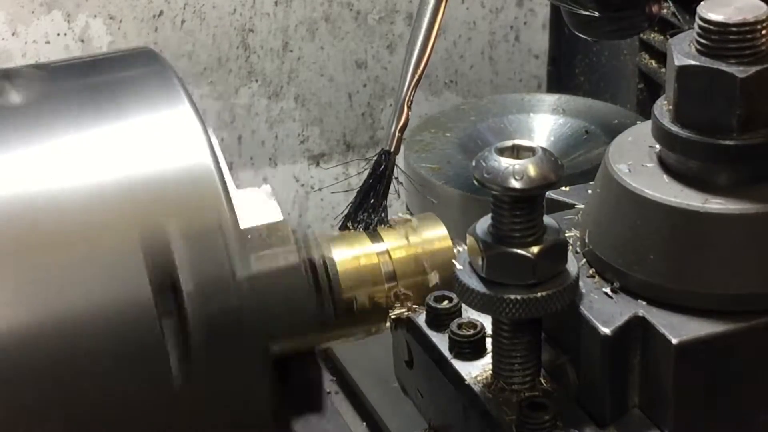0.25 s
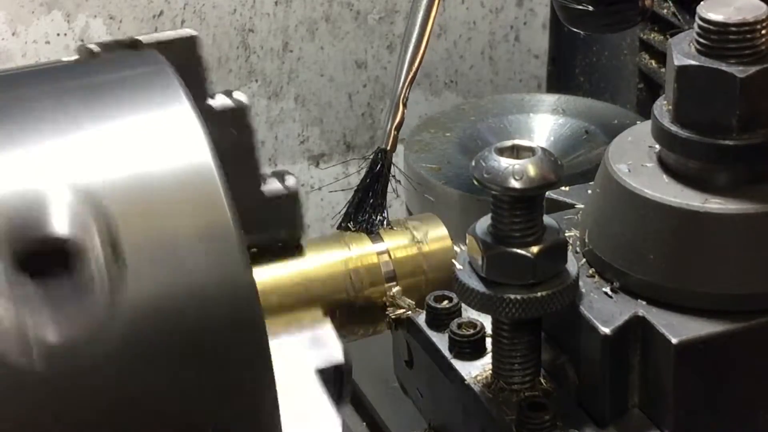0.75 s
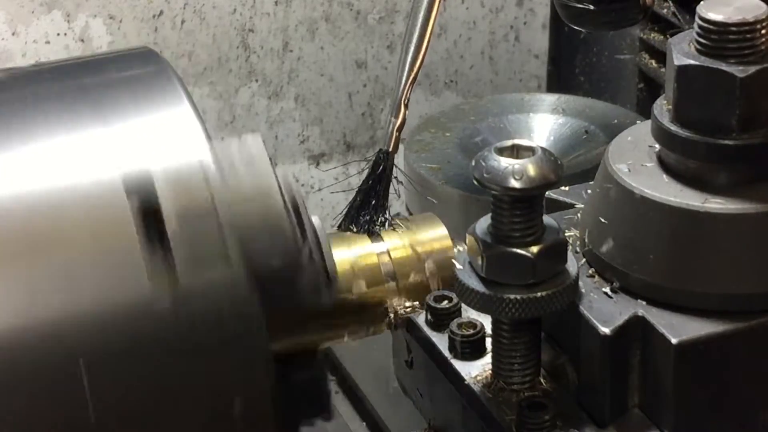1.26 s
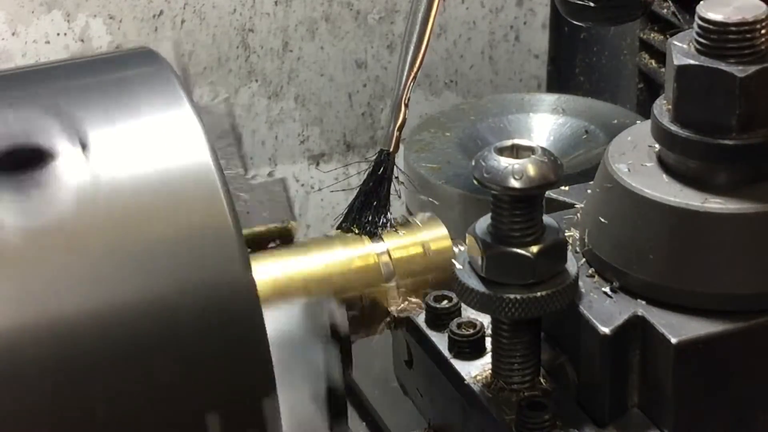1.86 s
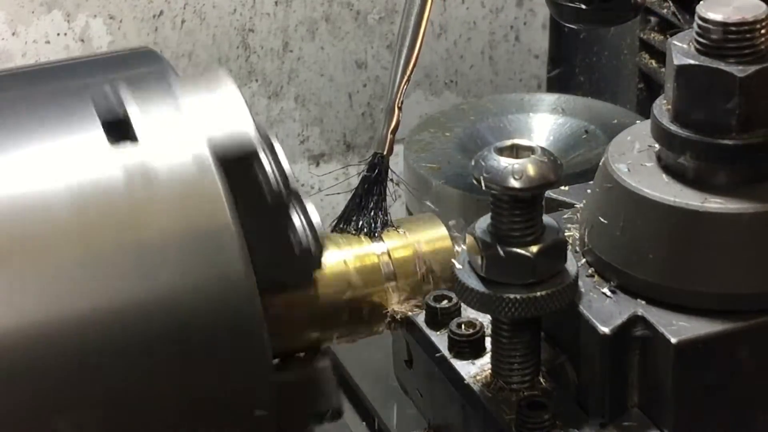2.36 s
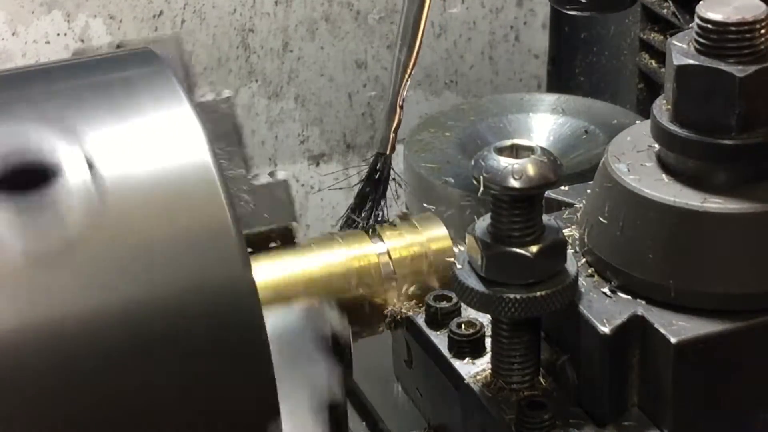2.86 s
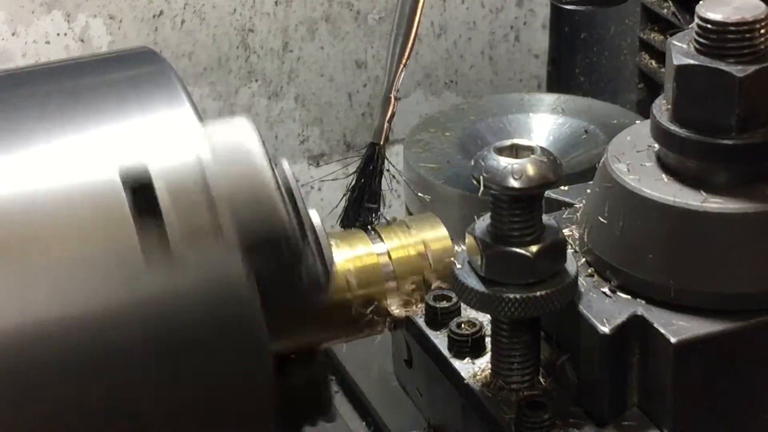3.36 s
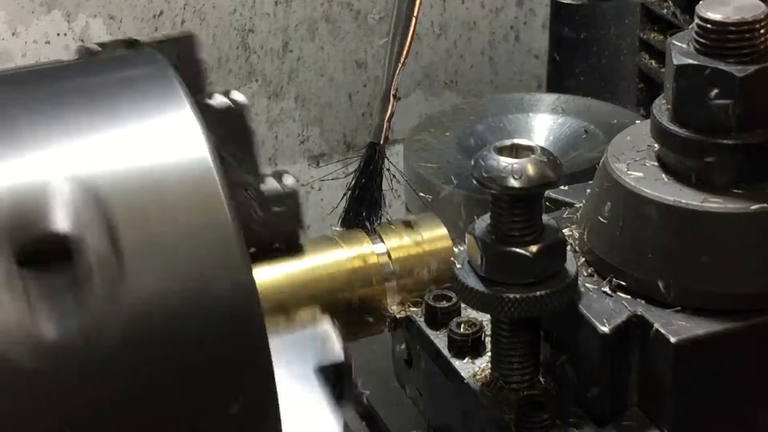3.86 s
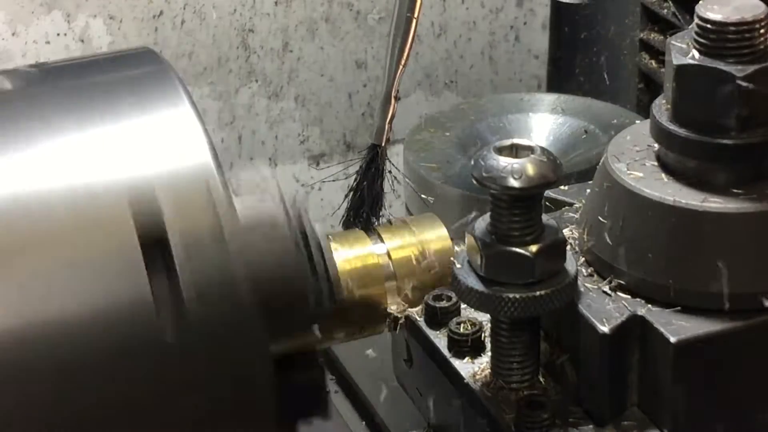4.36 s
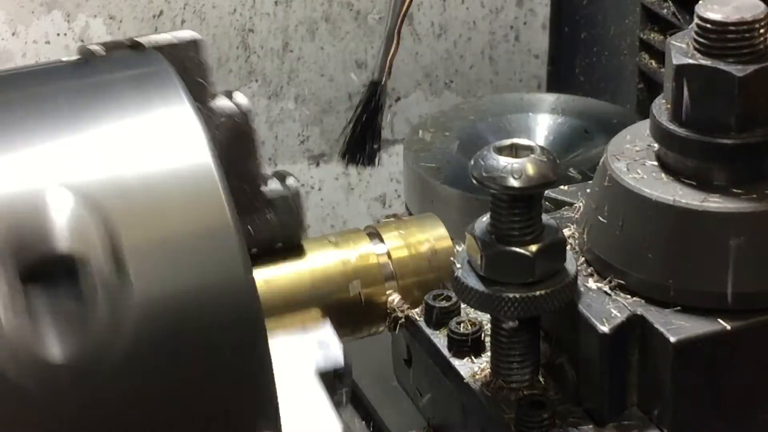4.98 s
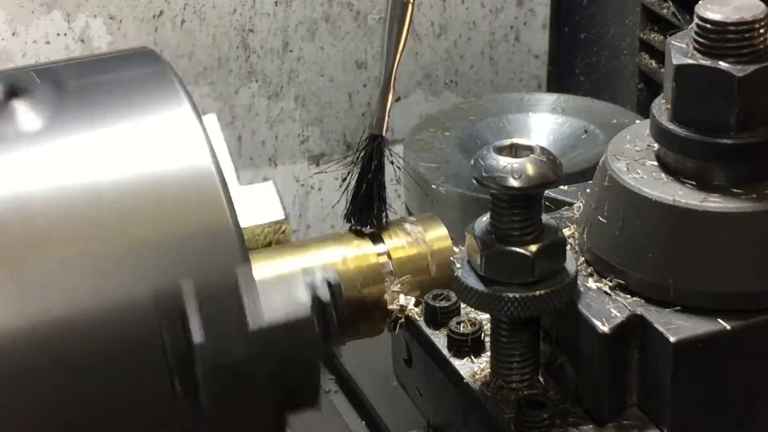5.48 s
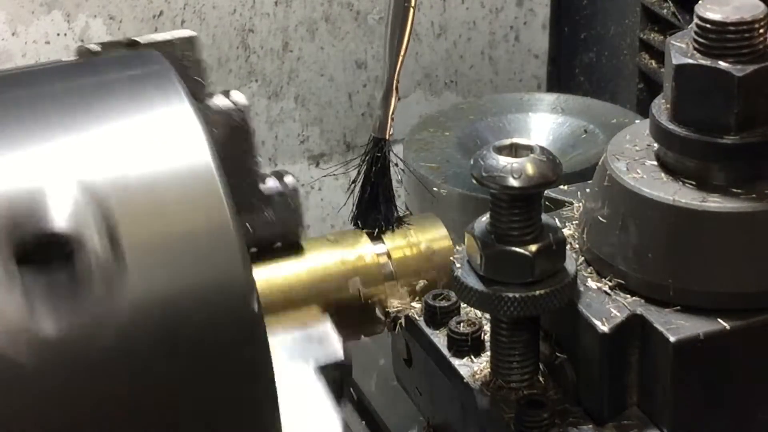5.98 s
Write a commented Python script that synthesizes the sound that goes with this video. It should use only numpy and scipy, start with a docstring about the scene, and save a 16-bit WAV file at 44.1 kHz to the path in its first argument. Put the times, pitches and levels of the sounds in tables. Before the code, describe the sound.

A gritty metallic screech shears from a turning brass rod, heard from very near with a short metallic room ring. Its pitch wobbles restlessly and its brightness pulses quickly with the chuck. It lifts and thins out twice, leaving whirr and low electric hum, and comes back abruptly each time. Tiny dips briefly hush the hiss and rumble.

```python
"""A small lathe parts a brass rod in a workshop, heard from close by. The chip shears off in thousands of tiny
segments a second: a rough squeal that falls as the feed deepens, and rises and fades as it eases. The chip hisses
on the tool, and steel resonances ring at fixed pitches. The motor hums at multiples of its magnetic pull and
rumbles, the bearings and belt whirr, and a faint squeak grazes the rod. The noise dips briefly now and then."""
import sys
import numpy as np
from scipy import signal
from scipy.fft import rfft, irfft, next_fast_len
from scipy.io import wavfile
from scipy.ndimage import map_coordinates

SR = 44100
rng = np.random.default_rng(int(sys.argv[2]) if len(sys.argv) > 2 else 0)


def store_pcm(level_fs):
    """Save levels as 16-bit WAV."""
    pcm = np.round(np.clip(level_fs, -1, 1) * 32767).astype(np.int16)
    wavfile.write(sys.argv[1], SR, np.atleast_2d(pcm).T)


N = 274743
SECONDS = np.arange(N) / SR


def amp(db):
    """Gain of a level in dB."""
    return 10 ** (np.asarray(db) / 20)


def unit(x):
    """x at rms 1."""
    return x / np.sqrt(np.mean(x ** 2))


def along(points, hz):
    """Read a curve of (Hz, value) points on a log frequency axis."""
    point_hz, value = np.transpose(points)
    return np.interp(np.log(hz + 1), np.log(point_hz + 1), value)


def wobble(rate_hz):
    """A smooth random curve through rate_hz random knots a second."""
    knots = rng.standard_normal(int(N * rate_hz / SR) + 4)
    return map_coordinates(knots, [np.arange(N) * rate_hz / SR])


def filtered(x, response):
    """x times a response of frequency, zero-padded by at least half a second."""
    size = next_fast_len(N + SR // 2)
    spectrum = rfft(x, size) * response(np.fft.rfftfreq(size, 1 / SR))
    return irfft(spectrum, size)[..., :N]


def ringing(modes, hz):
    """A flat path plus causal resonances: their powers add, and the phase is that of their complex sum."""
    peaks = np.array([amp(level_db) * 1j * hz * width_hz / (mode_hz ** 2 - hz ** 2 + 1j * hz * width_hz)
                      for mode_hz, width_hz, level_db in modes])
    gain = np.sqrt(1 + np.sum(abs(peaks) ** 2, axis=0))
    return gain * np.exp(1j * np.angle(1 + peaks.sum(axis=0)))


def spindle():
    """Angle of the chuck in radians, 0 as its first jaw faces the listener."""
    turns_hz, first_jaw_s = 3.0, 0.05
    return 2 * np.pi * turns_hz * (SECONDS - first_jaw_s)


def cut(hush, waver=0.012, flutter_db=1.4, lopsided=0.33):
    """Chip segments snap off at an uneven rate (squeal), and the chip rubs on the tool face (hiss)."""
    # hand feed, heard as the shearing rate; a thicker chip breaks more slowly: time_s, rate_hz
    feed_curve = [(0, 3503), (.13, 3547), (.3, 4890), (.4, 5200), (.6, 4800), (.72, 4550), (.8, 3580),
                  (.96, 3150), (1.03, 3505), (1.1, 2800), (1.2, 3229), (1.4, 3485), (1.435, 4350),
                  (1.47, 3550), (1.53, 3270), (1.7, 3526), (1.77, 3120), (1.85, 3507), (1.93, 3140),
                  (2.06, 3563), (2.16, 3150), (2.24, 3386), (2.36, 2876), (2.46, 2946), (2.52, 3238),
                  (2.57, 2998), (2.63, 3188), (2.77, 3190), (2.86, 2950), (2.93, 3440), (3.05, 3280),
                  (3.15, 3458), (3.31, 3174), (3.37, 3475), (3.46, 3083), (3.53, 3330), (3.74, 3400),
                  (3.84, 2800), (3.96, 3150), (4.02, 3488), (4.18, 3323), (4.32, 2790), (4.45, 2901),
                  (4.5, 3220), (4.56, 3030), (4.63, 3180), (4.75, 2960), (4.82, 2704), (4.96, 2852),
                  (5.05, 3560), (5.15, 4800), (5.21, 5400), (5.52, 5200), (5.56, 4290), (5.61, 3400),
                  (5.68, 2588), (5.78, 2200), (5.87, 2125), (5.95, 2750), (6.03, 3784), (6.12, 3507),
                  (6.17, 3895), (6.23, 3340)]
    # how firmly the tool bites; it backs out twice and re-enters: time_s, bite_db
    bite_curve = [(0, 1), (.14, -2.5), (.28, -9), (.32, -17), (.4, -31), (.55, -40), (.62, -8.5),
                  (.72, -7.5), (.8, -2), (.95, -1.5), (1.1, 0), (1.85, -1.5), (2.05, 0.5), (2.2, -1),
                  (2.45, 0.5), (3.2, -.5), (3.38, 0.5), (4.2, -0.5), (4.331, 3), (4.45, -1.5), (4.6, 0),
                  (4.78, 1), (4.825, 3), (4.88, 0.5), (5.05, -1), (5.15, -4.5), (5.2, -12), (5.26, -27),
                  (5.5, -27), (5.546, -3.5), (5.65, -2), (5.8, 0), (5.92, -0.5), (6.03, -2.5), (6.23, -3)]
    # each chip thickness, before bite and body: rate_hz, squeal_db, rub_db, rate_scatter (fraction)
    chip = [(2101, -44.5, -45.5, .11), (2695, -44.5, -47.5, 0.05), (3049, -44, -48.5, .05),
            (3498, -43.5, -52, .07), (4102, -45.5, -51, .085), (4805, -46, -50, .12), (5400, -47, -46, .12)]
    # shape of one snap: multiple, level_db (relative), jaw_db (swell per unit of the jaw pattern)
    overtones = [(1, 1.5, 0.7), (2, -4.5, 4), (3, -8, 1.5), (4, -10, 0)]
    # broad response of the machine to a force at the tool tip: frequency_hz, gain_db
    body = [(300, -35), (1000, -8.5), (2100, -5.5), (3300, -0.5), (5000, -2), (6800, -4), (7700, -14),
            (10300, -15.5), (12700, -16), (15500, -11)]

    feed_hz = np.interp(SECONDS, *np.transpose(feed_curve))
    bite_db = np.interp(SECONDS, *np.transpose(bite_curve))
    chip_hz, *chip_columns = np.transpose(chip)
    squeal_db, rub_db, scatter = [np.interp(feed_hz, chip_hz, column) for column in chip_columns]

    # the dips calm the fast scatter, so the squeal turns clearer
    rate_hz = feed_hz * (1 + scatter * hush * wobble(1500) + waver * wobble(60))
    phase = 2 * np.pi * np.cumsum(rate_hz) / SR

    # three jaws throw the treble towards the listener, one jaw more than the others
    angle = spindle()
    jaws = np.cos(3 * angle) + 0.3 * np.cos(6 * angle) + lopsided * np.cos(angle)

    # the shape of the snap keeps changing, so each overtone flutters by itself
    snaps = sum(amp(level_db + jaw_db * jaws + flutter_db * wobble(16)) * np.cos(multiple * phase)
                for multiple, level_db, jaw_db in overtones)
    # segments differ in size, which spreads a rough skirt around the lowest line
    sizes = 0.29 * hush * wobble(1300) * np.cos(0.93 * phase)
    squeal_gain = amp(bite_db + squeal_db + 2.23 * hush * wobble(300))
    squeal = squeal_gain * (unit(snaps) + sizes)

    rub_gain = amp(bite_db + rub_db + 0.072 * jaws + 1.4 * wobble(15) + 1.6 * wobble(400))
    rub = rub_gain * rng.standard_normal(N)
    return filtered(np.array([squeal, rub]), lambda hz: amp(along(body, hz)))


def whirr():
    """Bearing and belt noise: broad, shaped hiss with a slow and a fast flutter."""
    # colour of bearings and belt: frequency_hz, density_db (relative, per Hz)
    whirr_colour = [(410, -48), (700, -8.5), (1200, -16.5), (2100, -19.5), (3700, -8), (5200, -5),
                    (6100, -8.5), (7700, -13), (10300, -27.5), (12700, -27), (15500, -22)]
    noise = amp(1.97 * wobble(14) + 1.25 * wobble(200)) * rng.standard_normal(N)
    return amp(-60.5) * unit(filtered(noise, lambda hz: amp(along(whirr_colour, hz))))


def motor(hush):
    """Rumble of motor casing and bench: slowly swelling noise in the casing's resonances."""
    # colour of the rumble: frequency_hz, density_db (relative, per Hz)
    rumble_colour = [(25, -49), (60, -23.5), (120, -26), (170, -21), (280, -11), (410, -19), (700, -26),
                     (1200, -32), (2500, -30)]
    # resonances of the casing: frequency_hz, width_hz, level_db (over the rumble)
    casing_modes = [(155, 13, 8), (255, 45, -1), (336.7, 11.2, 18.5), (344, 8.3, -5), (539, 28, 6.5),
                    (744, 30, 3.5)]
    noise = hush * amp(0.84 * wobble(5.23)) * rng.standard_normal(N)
    rumble = filtered(noise, lambda hz: amp(along(rumble_colour, hz)) * ringing(casing_modes, hz))
    return amp(-58.5) * unit(rumble)


def hum():
    """The motor's magnetic pull: steady pitches at its multiples, each wavering a little in level."""
    # tones of the pull: multiple, level_db (rms, before the waver)
    hum_tones = [(1, -71.5), (2, -73.5), (3, -63.5), (4, -80), (6, -97), (7, -79)]
    pull_hz, waver_db = 100.07, 1.6
    phase = 2 * np.pi * pull_hz * SECONDS
    total = 0
    for multiple, level_db in hum_tones:
        gain = np.sqrt(2) * amp(level_db + waver_db * wobble(10))
        total = total + gain * np.sin(multiple * phase + rng.uniform(0, 2 * np.pi))
    return total


def dips():
    """Gain that sinks for a few hundredths of a second, in bell-shaped notches."""
    # brief dips of the noise: centre_s, depth_db
    dip_table = [(.623, -12), (2.108, -13), (2.296, -12), (2.735, -14), (3.061, -15), (3.503, -12),
                 (4.059, -11), (4.264, -10), (4.884, -7), (5.384, -7), (5.706, -10), (5.8, -13),
                 (5.917, -12)]
    width_s = 0.009
    return amp(sum(depth_db * np.exp(-((SECONDS - centre_s) / width_s) ** 2)
                   for centre_s, depth_db in dip_table))


def graze():
    """The tool grazes the rod as it backs out: a faint squeak of narrow-band noise that swells and fades."""
    # squeaks: centre_s, width_s, pitch_hz, band_hz, level_db (rms at the peak, before the room)
    squeaks = [(5.255, .045, 3090, 60, -58)]
    total = 0
    for centre_s, width_s, pitch_hz, band_hz, level_db in squeaks:
        band = filtered(rng.standard_normal(N), lambda hz: np.exp(-((hz - pitch_hz) / band_hz) ** 2))
        total = total + amp(level_db) * np.exp(-((SECONDS - centre_s) / width_s) ** 2) * unit(band)
    return total


def shop(x, wet_db=-6, count=3):
    """Direct sound plus diffuse tails; the turning chuck keeps changing which paths the sound takes."""
    # decay of splash guard and walls: frequency_hz, t60_s
    decay = [(200, 0.93), (2000, 0.24), (6000, 0.072), (15000, 0.21)]
    # quarter-second noise tails, each frequency fading at its own pace
    hz, tail_s, bins = signal.stft(rng.standard_normal((count, SR // 4)), SR, nperseg=256)
    fade = amp(-60 * tail_s / along(decay, hz)[:, None])
    tails = signal.istft(bins * fade, SR, nperseg=256)[1]
    wet = 0
    for k, tail in enumerate(tails):
        sent = x * np.cos(spindle() / 2 + np.pi * k / count)
        wet = wet + signal.fftconvolve(sent, tail[None] / np.linalg.norm(tail), axes=1)
    return x + amp(wet_db) * wet[:, :N]


def scene():
    """Cut and bearings ring the same steel; the motor hums beside them."""
    # resonances of tool, post and rod: frequency_hz, width_hz, level_db (over the broad response)
    steel_modes = [(1336, 67, 14), (1591, 37, 12.5), (1740, 69, 16.5), (1760, 72, 7), (1945, 27, 11.5),
                   (2310, 11, 4), (2485, 21.1, 28), (2614, 73, 8), (2770, 11, 5.5), (3162, 90, 7.5),
                   (3240, 69, 0.5), (3530, 54, -3.5), (3597, 83, 10.5), (3700, 134, 5.5), (4070, 120, 2),
                   (4345, 380, 8.5), (4720, 510, 6.5), (5320, 44, 7.5), (6500, 72, 7.5), (7048, 180, 14),
                   (8400, 140, 12.5), (9000, 230, 13.5), (9580, 160, 10.5), (11330, 256, 17),
                   (13700, 380, 1), (14370, 290, 8.5), (15200, 600, -4)]
    hush = dips()
    squeal, rub = cut(hush)
    squeal, hiss = filtered(np.array([squeal, rub + whirr()]), lambda hz: ringing(steel_modes, hz))
    squeal, hiss = shop(np.array([squeal + graze(), hiss]))
    # hiss and rumble take the full dip, the squeal barely sinks and the hum holds
    return (squeal * hush ** 0.12 + hiss * hush + motor(hush) + hum())[None]


def record(dry):
    """Nothing is kept above the band limit."""
    top_hz = 15730
    return filtered(dry, lambda hz: hz < top_hz)


dry = scene()
out = record(dry)
store_pcm(out)
```